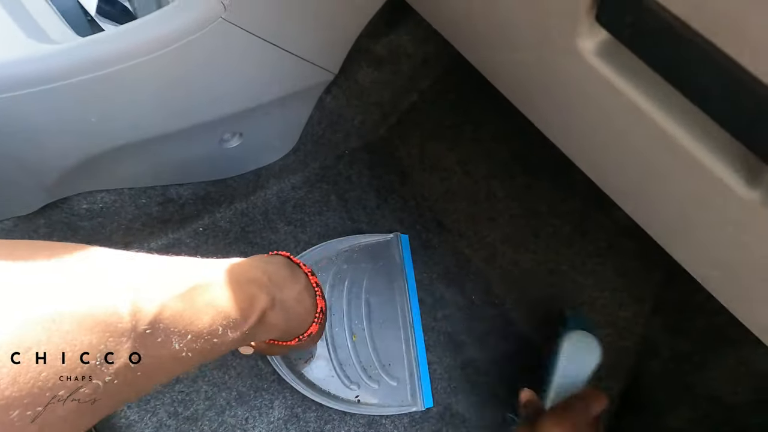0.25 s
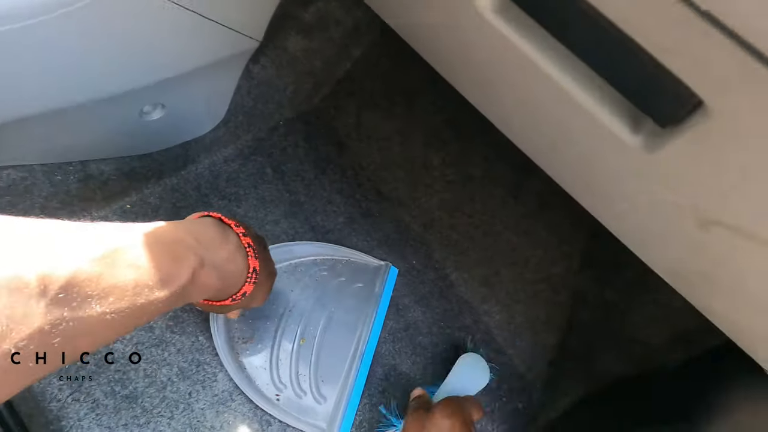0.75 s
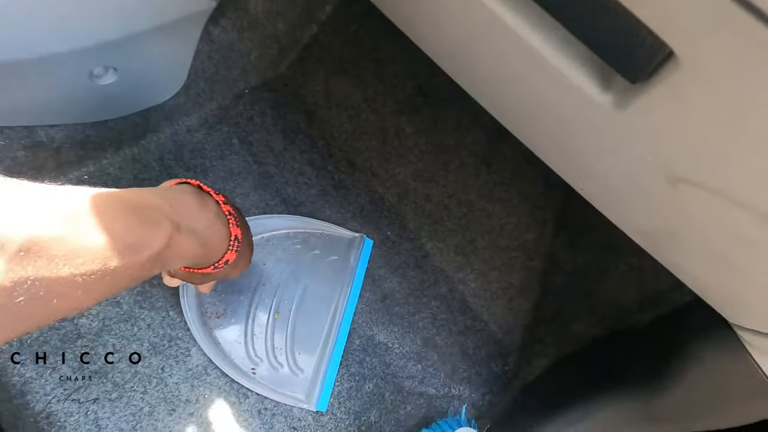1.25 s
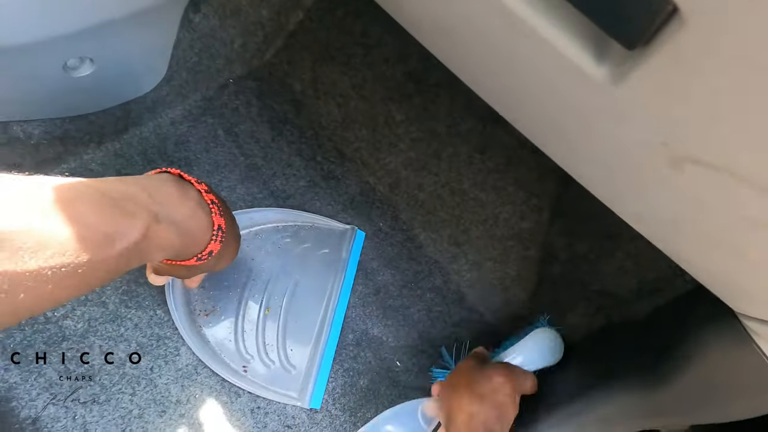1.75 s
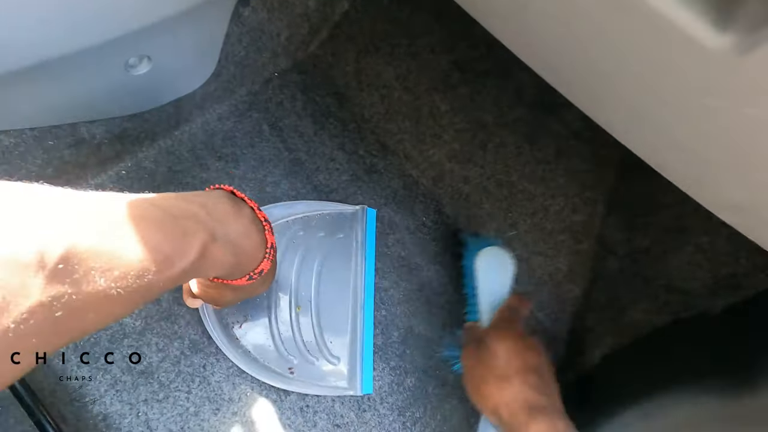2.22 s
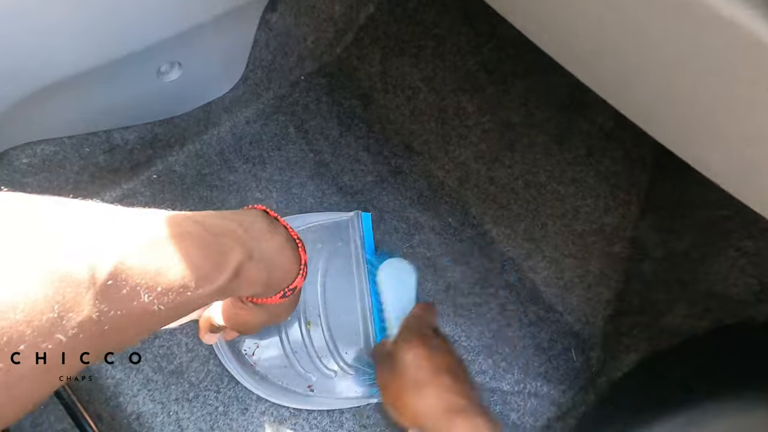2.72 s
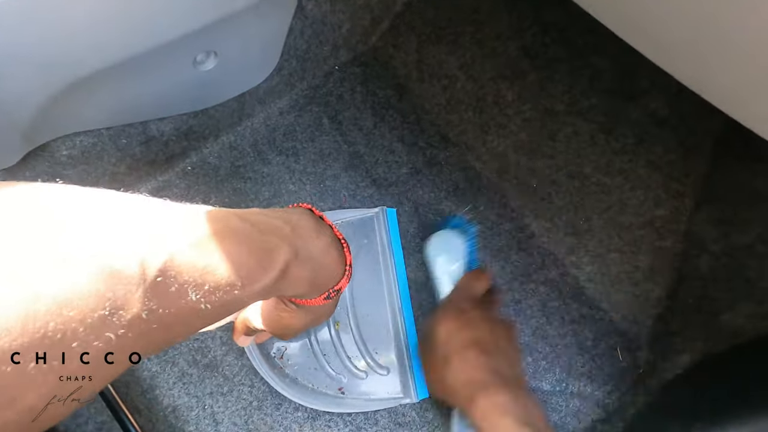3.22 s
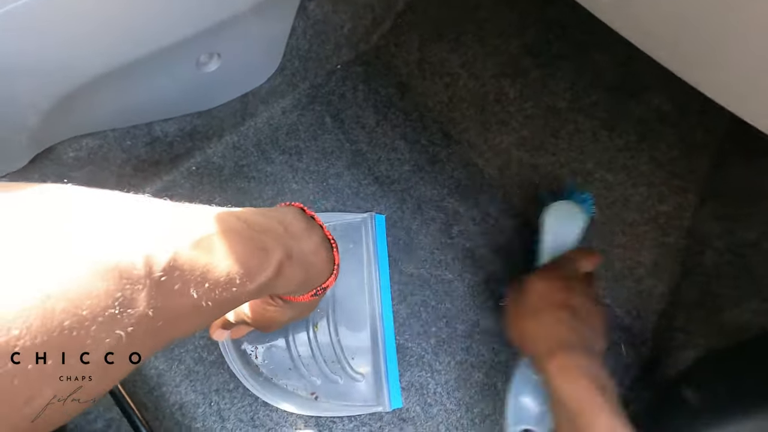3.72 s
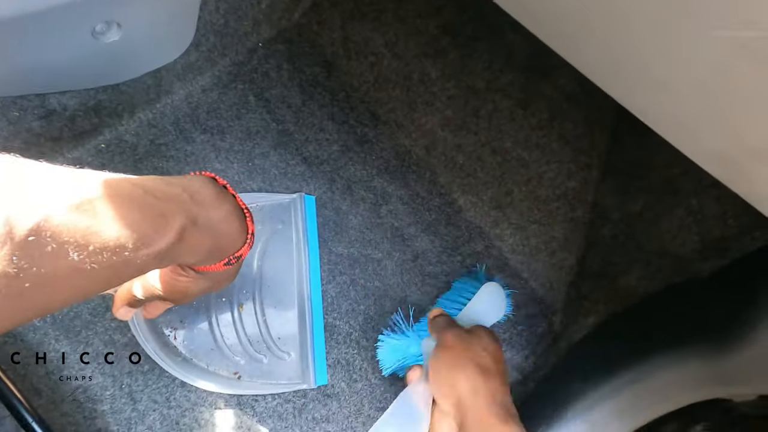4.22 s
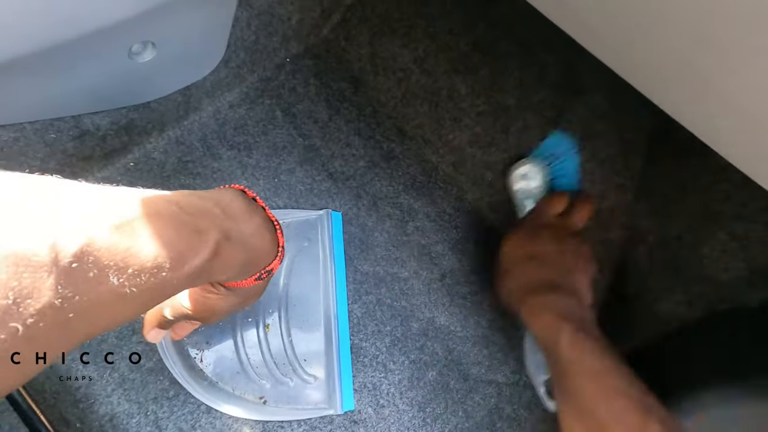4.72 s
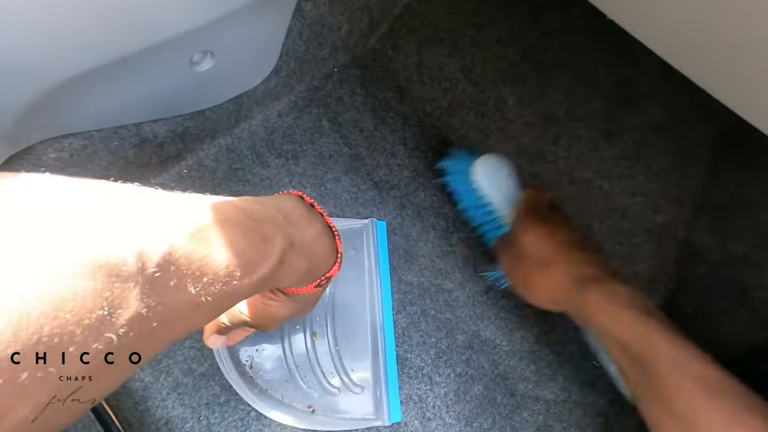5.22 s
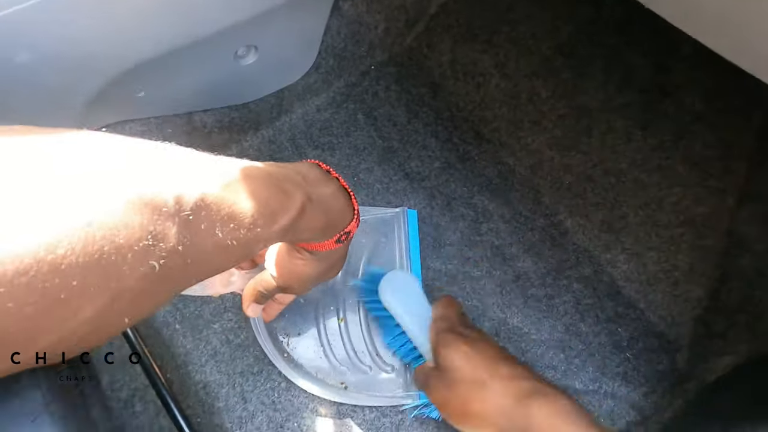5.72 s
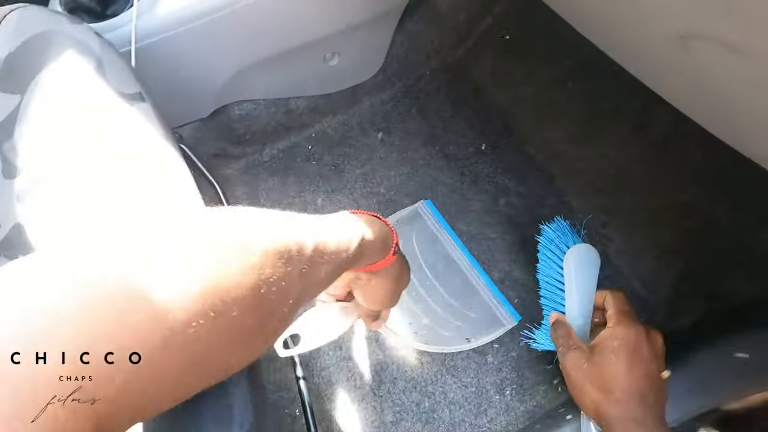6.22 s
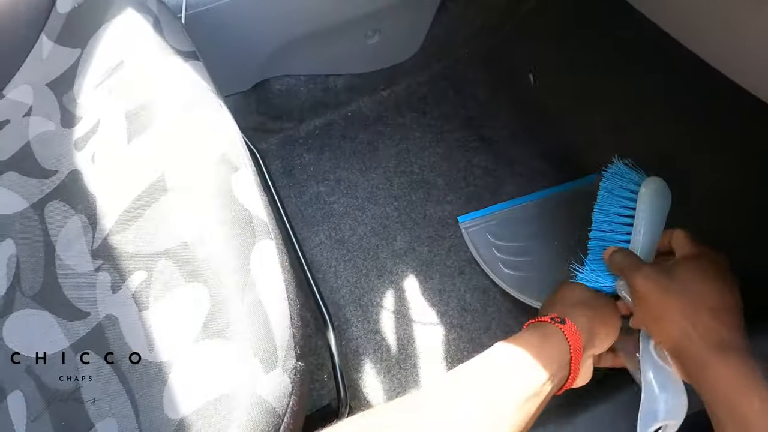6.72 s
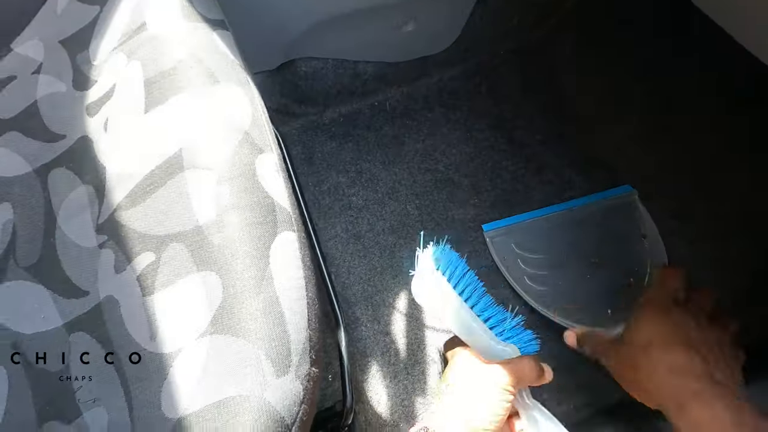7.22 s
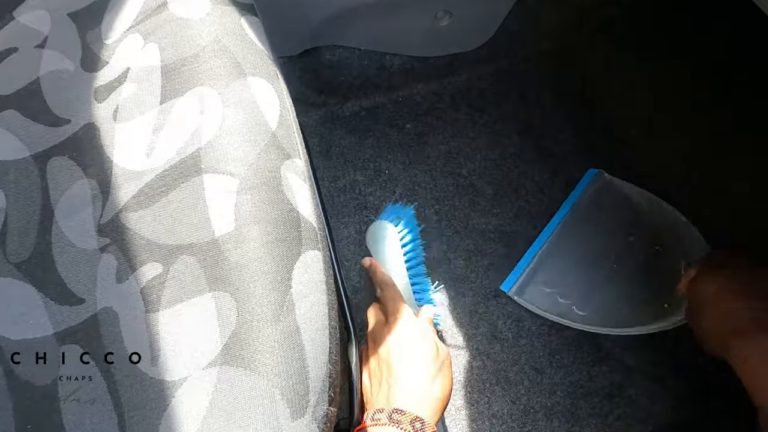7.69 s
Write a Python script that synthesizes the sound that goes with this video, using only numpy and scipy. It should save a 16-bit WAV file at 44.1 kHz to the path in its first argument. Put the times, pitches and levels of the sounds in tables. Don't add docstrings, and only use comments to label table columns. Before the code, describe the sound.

Brisk bristle strokes, each a dull knock and a crisp hiss, give way to plastic clacks, soft bumps and scraping inside a parked car.

```python
import sys
import numpy as np
from scipy import signal
from scipy.fft import rfft, irfft, next_fast_len
from scipy.io import wavfile

SR = 44100
rng = np.random.default_rng(int(sys.argv[2]) if len(sys.argv) > 2 else 0)


def wav_record(signal):
    frames = np.transpose(np.atleast_2d(signal))
    bounded = np.clip(frames, -1, 1)
    quanta = np.round(bounded * 32767).astype(np.int16)
    wavfile.write(sys.argv[1], SR, quanta)


def convert_level_to_amplitude(level_db):
    exponent = np.asarray(level_db, float) / 20
    return 10 ** exponent


N = 350595

# time in seconds, strength in dB.
WIND = [(0, -56), (1.08, -40), (1.16, -13), (1.28, -44), (4.8, -39), (5.05, -27), (5.25, -68), (5.9, -40),
        (6.15, -31), (6.62, -42), (6.76, -17), (6.86, -31.5), (7.04, -26), (7.08, -17.5), (7.28, -19.5),
        (7.55, -18.5), (7.66, -37), (7.95, -30)]
# frequency in Hz, density in dB per Hz.
RUMBLE_SPECTRUM = [(26, -4), (31, -9), (38, -6.5), (50, -10), (68, -4.5), (85, -29), (120, -9.5)]
# frequency in Hz, density in dB per Hz.
GUST_SPECTRUM = [(70, -31), (100, 4), (150, 2.5), (220, -5.5), (350, -15.5), (600, -19), (1000, -26)]
# frequency in Hz, density in dB per Hz.
AIR_SPECTRUM = [(120, -49), (200, 8.5), (269, 5.5), (404, 3), (804, 3.5), (1060, 4), (1600, -10),
                (2490, -16.5), (6530, -24.5), (10000, -23), (13000, -62), (22000, -120)]
# frequency in Hz, left-right likeness from 0 to 1.
LIKENESS = [(140, 1), (270, 1), (450, 1), (950, 0.91), (2380, 1), (5980, 0.87), (9000, 0.86), (14000, 0.56)]
# frequency in Hz, left minus right in dB.
LEAN = [(60, 0.6), (180, -1), (550, -.8), (1650, -1.2), (4970, -1.0), (15000, .5)]
# frequency in Hz, left lead in radians.
LEFT_LEAD = [(120, 0), (300, -0.08), (1000, -.25), (2400, -0.9), (5000, -0.37), (8100, 0.12)]
# time in seconds, peak in dB, frequency in Hz, T60
# in seconds.
RINGS = [(2.7278, -16, 1360, 0.0082), (4.8235, -16, 910, .012), (5.1318, -10.5, 700, 0.016),
         (6.066, -15.5, 317, 0.015), (6.072, -20, 594, 0.052), (6.256, -24, 1100, .012),
         (6.1745, -11, 1150, 0.0089), (6.1485, -11, 520, 0.038), (6.19, -22, 477, .04),
         (2.4325, -17, 595, 0.0079), (5.4295, -12, 537, 0.018), (6.1755, -15, 640, 0.027),
         (6.2215, -16.5, 2430, 0.019), (6.223, -18, 600, 0.037), (7.055, -21, 227, .04),
         (7.192, -23, 300, .03), (7.29, -28, 420, .025), (7.321, -19, 240, 0.036),
         (7.376, -21.5, 377, 0.032), (7.392, -17, 260, 0.036), (7.465, -21, 300, .03),
         (7.53, -20, 326, 0.025), (7.77, -35, 1240, .03), (7.793, -27, 1150, .03), (7.808, -30, 1240, .03),
         (7.846, -36, 1210, .03), (7.869, -28, 1180, 0.038), (7.886, -43, 1200, .03),
         (7.93, -37, 1190, .03)]
# frequency in Hz, level in dB, T60 in seconds.
PAN_MODES = [(534, 20, 0.042), (724, 21.5, 0.011), (326, 3.5, 0.16), (2490, 14, 0.056), (3140, 0, 0.01),
             (4930, 44, 0.0032), (5930, -1, 0.0035), (7140, -15, .005)]
# time in seconds, peak in dB, low modes and middle in relative dB.
KNOCKS = [(0.0147, -26, -28, -5.5), (0.6393, -28, 3, -6), (1.038, -45, 19, 11), (1.1124, -28, 2, -3),
          (1.8117, -41, -12, -16), (3.1654, -23.5, -26, -16), (4.2903, -36, 5, -15), (4.508, -30, -30, -2),
          (5.043, -29.5, -13.5, -28), (5.957, -23.5, -34, -18), (6.0347, -26, -21, -25),
          (6.0639, -27.5, 9.5, 5.5), (6.1458, -33, 12, -1), (6.1754, -19, 4, -1.5), (6.2215, -18, 0, -5.5),
          (6.256, -31, 3, 1), (6.3564, -27, -5.5, -19), (7.5666, -56.5, 0, 19), (0.122, -17.5, -25, -25),
          (0.739, -17, -33, -16), (1.069, -27.5, -22, 2), (1.391, -15, -17, -11.5), (4.239, -21, -35, -3),
          (4.769, -13, -15, -33), (5.492, -26, -13, 1)]
# time in seconds, peak in dB.
TICKS = [(6.576, -42), (6.678, -36), (6.886, -40), (6.914, -46), (6.933, -40), (6.986, -42), (7.19, -47),
         (7.24, -48), (7.291, -43), (7.311, -57), (7.379, -54), (7.418, -48), (7.448, -43), (7.468, -44),
         (7.568, -47)]
# time in seconds, effort in dB.
HANDLING = [
    (6.034, -51),
    (6.078, -37),
    (6.17, -44.5),
    (6.23, -43),
    (6.7, -45),
    (6.76, -54),
    (7.06, -56),
    (7.14, -61),
    (7.34, -77),
]
# frequency in Hz, density in dB per Hz.
RUSTLE_SPECTRUM = [(760, -23), (1300, -7), (1700, -4), (1990, 9.5), (3030, -12), (3510, 1.5), (6980, -2.5),
                   (8260, -11.5), (11800, -19), (14000, -22)]
# start in
# seconds, length in seconds, rustle or scrape in dB, carpet in relative dB.
PAN_CONTACTS = [(6.33, 0.027, -52, -2), (6.43, 0.055, -62, 2), (6.53, 0.074, -49, 0.5), (6.63, 0.059, -59, 8),
                (6.79, 0.083, -49.5, -3), (6.94, 0.059, -58, 7), (7.0, 0.09, -53, -12), (7.17, 0.028, -61, -6),
                (7.46, 0.074, -54.5, 12.5), (7.545, 0.035, -42.5, 6), (7.638, 0.061, -31.5, -10),
                (7.66, 0.38, -46, 3), (7.76, 0.053, -43, 1), (7.585, 0.04, -65, 1), (7.9, 0.056, -56, 8)]
# frequency in Hz, width in Hz, level in dB.
LIP_MODES = [(1210, 230, -10), (1620, 570, 11), (2020, 480, 8.5), (3200, 550, 7.5), (3930, 440, 3.5),
             (5170, 1500, -3), (7100, 900, -9), (8300, 810, -22)]
# time in seconds, peak in dB, ring in Hz.
CATCHES = [(0.089, -27, 900), (0.771, -18.5, 690), (0.799, -19, 1000), (1.019, -44, 910),
           (1.445, -30, 1000), (1.505, -19, 1010), (1.522, -12, 1020), (1.64, -28, 1200), (1.923, -9, 700),
           (2.181, -20, 910), (2.205, -12.5, 920), (2.414, -30, 700), (2.483, -21, 1090),
           (3.614, -25, 1080), (3.847, -37, 590), (3.906, -12, 1100), (4.296, -18, 1100), (4.309, -9, 1030),
           (4.513, -14.5, 900), (4.562, -13, 1010), (4.823, -18, 1000), (4.847, -17, 1110),
           (5.1291, -15, 740), (5.305, -17.5, 1100), (5.485, -16.5, 796), (5.749, -16, 590),
           (6.074, -15.5, 603), (6.088, -31, 494), (6.191, -16, 560), (6.237, -21, 550), (6.575, -21, 795),
           (6.695, -26, 800)]
# time in seconds, knock peak in dB, knock in Hz, boom in dB, slap in dB.
LANDINGS = [(0.12, -17, 430, -32, -12.5), (0.452, -16, 410, -24, -13), (0.74, -13.5, 404, -23.5, -13.5),
            (1.067, -14, 396, -24, -20), (1.126, -5.5, 423, -24.5, -12.5), (1.391, -15.5, 443, -35, -18),
            (1.875, -26, 570, -30, -16.5), (1.891, -13, 370, -28, -15.5), (1.952, -11, 416, -31, -13.5),
            (2.166, -16.5, 555, -31, -15.5), (2.43, -7.5, 447, -20, -19), (2.7283, -6, 378, -20.5, -17),
            (3.022, -9.5, 387, -25, -16.5), (3.034, -16, 384, -26, -17), (3.311, -8.5, 405, -24, -18.5),
            (3.575, -11, 408, -21.5, -15.5), (3.863, -7.5, 367, -22.5, -15.5),
            (4.235, -16.5, 456, -23.5, -14), (4.523, -8.5, 388, -25.5, -13),
            (4.769, -15.5, 407, -25, -10.5), (4.8, -11.5, 283, -20, -40), (5.13, -3.5, 299, -16.5, -31),
            (5.4279, -8.5, 297, -19.5, -27), (5.731, -16.5, 447, -22, -18)]
# time in seconds, knock peak in dB, knock in Hz, boom in dB.
BUMPS = [(4.307, -24, 402, -56), (5.227, -48, 258, -28.5), (2.895, -32, 342, -47), (5.491, -17, 400, -20),
         (6.728, -40, 323, -26), (6.882, -21.5, 362, -21.5), (7.087, -16, 240, -49), (7.16, -18, 248, -45),
         (7.236, -21.5, 420, -22.5), (7.277, -22, 248, -36), (7.318, -24, 260, -45),
         (7.352, -18.5, 290, -24), (7.432, -25, 304, -34), (7.506, -21, 287, -24.5), (7.547, -23, 314, -25)]
# frequency in Hz, level in dB, T60 in seconds.
FLOOR_MODES = [(149.1, 14.5, 0.12), (175, 12.5, 0.062), (217.5, 10, 0.054)]
# landing in seconds, time to full speed and to lift-off in seconds,
# bristle hiss in dB, carpet drag in dB.
STROKES = [(0.117, 0.054, 0.13, -21, -22), (.451, 0.068, 0.12, -25.5, -24), (0.744, 0.099, .15, -22, -22.5),
           (1.095, 0.02, .13, -26.5, -26.5), (1.392, 0.14, 0.32, -25, -23), (1.5, 0.074, 0.11, -21, -24.5),
           (1.6, 0.031, 0.15, -25.5, -27.5), (1.876, 0.093, 0.17, -23, -37),
           (2.163, 0.06, 0.13, -19.5, -24), (2.429, 0.054, 0.13, -20.5, -22),
           (2.725, 0.036, 0.1, -21.5, -27.5), (3.022, 0.044, 0.099, -20, -27.5),
           (3.308, 0.032, 0.09, -19, -22.5), (3.573, 0.052, 0.12, -19.5, -23.5),
           (3.859, 0.043, 0.1, -19.5, -27), (4.236, 0.089, 0.14, -22.5, -26),
           (4.519, 0.06, 0.1, -19.5, -26.5), (4.769, 0.092, 0.145, -21, -22),
           (4.869, 0.045, 0.086, -23.5, -27.5), (5.13, 0.076, 0.16, -21, -28.5),
           (5.428, 0.085, 0.12, -19, -25), (5.73, 0.04, 0.097, -19.5, -24.5)]
# start in seconds, length in seconds, hiss in dB, carpet in relative dB.
GRAZES = [(0, 0.17, -42.5, 6.5), (.38, 0.21, -43.5, 1), (.6, 0.13, -43, 3), (.92, 0.072, -47, 8.5),
          (1.028, 0.062, -41.5, 12), (1.3, 0.17, -49.5, -5), (1.85, 0.2, -42, 12.5),
          (2.07, 0.098, -44.5, -7), (2.33, 0.039, -44.5, 1), (2.57, 0.11, -42, 1.5), (2.85, 0.081, -49, 7),
          (2.97, 0.22, -57.5, 14), (3.15, 0.034, -44, -12), (3.42, 0.051, -38, 2.5),
          (3.52, 0.038, -59, 12.5), (3.99, 0.14, -58.5, 7.5), (4.14, 0.1, -50.5, 12), (4.2, 0.064, -60, 8),
          (5.7, 0.033, -67, 2), (.715, 0.025, -48, 5.5), (4.4, 0.12, -56.5, 13), (4.7, 0.1, -60, 18),
          (5.03, 0.025, -45.5, -17), (5.085, 0.053, -59, 9.5), (5.575, 0.027, -36.5, -2),
          (5.62, 0.031, -56.5, 0), (4.67, 0.034, -58, 7), (1.78, 0.033, -60, 5), (5.94, 0.019, -50.5, 5.5),
          (5.99, 0.049, -57, 4), (.29, 0.071, -57, 8), (3.725, 0.032, -51.5, 4), (4.285, 0.017, -51, 8)]
# frequency in Hz, density in dB per Hz.
BRISTLE_SPECTRUM = [(1180, -3.5), (2000, -1.5), (2240, -7), (2540, -8.5), (2790, -7), (4470, -1.5),
                    (5000, -5), (6190, 0), (7600, -9), (9340, -14.5), (12100, -20), (14100, -17),
                    (15500, -54)]
# frequency in Hz, density in dB per Hz.
CARPET_SPECTRUM = [(120, 6.5), (200, 3), (273, -1), (452, 8.5), (799, -1), (908, 4), (1080, 10.5),
                   (1490, 0), (2240, -9.5), (2600, -4.5), (3380, -12), (5720, -120)]


def rms_one(x):
    return x / np.sqrt(np.mean(x ** 2) + 1e-20)


def peak_one(x):
    return x / np.abs(x).max()


def seconds(length_s):
    return np.arange(int(length_s * SR)) / SR


def gain_curve(rows):
    s, db = np.transpose(rows)
    return convert_level_to_amplitude(np.interp(np.arange(N) / SR, s, db))


def at_hz(points, hz):
    points_hz, values = np.transpose(points)
    return np.interp(np.log(hz), np.log(points_hz), values)


def drift(rate_hz, count):
    r = np.exp(-40 * np.pi * rate_hz / SR)
    noise = rng.standard_normal(count // 20 + 4002)
    return rms_one(signal.lfilter([1], [1, -2 * r, r * r], noise)[4000:])


def every_sample(slow, count):
    return np.interp(np.arange(count) / 20, np.arange(len(slow)), slow)


def ring(clicks, hz, t60_s):
    r = convert_level_to_amplitude(-60 / (t60_s * SR))
    w = 2 * np.pi * hz / SR
    return signal.lfilter([0, np.sin(w)], [1, -2 * r * np.cos(w), r * r], clicks + 1e-18)


def band(x, low_hz, high_hz):
    return signal.sosfilt(signal.butter(2, [low_hz, high_hz], "band", fs=SR, output="sos"), x)


def low_pass(x, hz, order):
    return signal.sosfilt(signal.butter(order, hz, fs=SR, output="sos"), x)


def grains(per_s, spread_db, count=N):
    shape = (2, 2, count)
    sizes = convert_level_to_amplitude(spread_db * np.minimum(rng.exponential(1, shape), 4))
    signed = sizes * rng.choice([-1, 1], shape)
    return signed * (rng.random(shape) < per_s / SR) + 1e-18


def coloured(source, spectrum, patchy_db, rate_hz, apart=None, bands_per_octave=3):
    count = source.shape[-1]
    out, together = np.zeros((2, count)), drift(rate_hz, count)
    low_hz, top_hz = spectrum[0][0], min(spectrum[-1][0], 17000)
    bands = max(2, round(bands_per_octave * np.log2(top_hz / low_hz)))
    edges_hz = np.geomspace(low_hz, top_hz, bands + 1)
    for k, (a, b) in enumerate(zip(edges_hz, edges_hz[1:])):
        hz = np.sqrt(a * b)
        mid, side = band(source[k % 2], a, b)
        alike = np.clip(at_hz(LIKENESS, hz) if apart is None else 1 - apart, 0, 1)
        flicker_db = patchy_db * (0.27 * together + drift(rate_hz, count))
        gain = every_sample(convert_level_to_amplitude(at_hz(spectrum, hz) + flicker_db), count)
        mid = gain * np.sqrt(1 + alike) * mid
        side = gain * np.sqrt(1 - alike) * side
        half_lean_db = at_hz(LEAN, hz) / 2
        out[0] += convert_level_to_amplitude(half_lean_db) * (mid + side)
        out[1] += convert_level_to_amplitude(-half_lean_db) * (mid - side)
    return rms_one(out)


def add(track, sound, s):
    at = round(s * SR)
    track[at:at + len(sound)] += sound[:N - at]


def smooth(x, time_s):
    memory = np.exp(-1 / (time_s * SR))
    return signal.lfilter([1 - memory], [1, -memory], x)


def traffic(white, wind, apart):
    traffic_db = -30
    rumble = coloured(white, RUMBLE_SPECTRUM, patchy_db=-0.5, rate_hz=13.0, apart=apart)
    return np.hypot(wind, convert_level_to_amplitude(traffic_db)) * rumble


def gusts(wind, turbulent, apart):
    build_s, rest_db = 0.2, -42.5
    built = np.minimum(smooth(wind, build_s), wind)
    eddies = built * turbulent + convert_level_to_amplitude(rest_db)
    noise = coloured(grains(70, 3.1), GUST_SPECTRUM, patchy_db=4.5, rate_hz=10.2, apart=apart, bands_per_octave=2)
    return eddies * noise


def still_air(white, near):
    air_db, gain_memory_s, threshold_db, dull_hz = -40.5, 0.25, -25.0, 6500
    recent = np.sqrt(smooth(near[0] ** 2, gain_memory_s))
    air = coloured(white, AIR_SPECTRUM, patchy_db=-4.0, rate_hz=7.3, bands_per_octave=2)
    return low_pass(convert_level_to_amplitude(air_db) / (1 + recent / convert_level_to_amplitude(threshold_db)) * air, dull_hz, order=2)


def outdoors(near):
    turbulent_db, calm_apart, gust_apart = -21.5, 0.09, 0.4
    wind = gain_curve(WIND)
    turbulent = wind ** 2 / (wind ** 2 + convert_level_to_amplitude(2 * turbulent_db))
    apart = np.clip(calm_apart + gust_apart * turbulent, 0, 1)
    white = rng.standard_normal((2, 2, 2, N))
    return traffic(white[0], wind, apart) + gusts(wind, turbulent, apart) + still_air(white[1], near)


def cabin(x, t60_s):
    t = seconds(0.25)
    noise = band(rng.standard_normal((2, len(t))), 90, 5000)
    tails = noise * convert_level_to_amplitude(-60 * t / t60_s) * (t > 0.002)
    tails = tails / np.sqrt((tails ** 2).sum(axis=1, keepdims=True))
    return signal.fftconvolve(x[None], tails, axes=1)[:, :N]


def rings():
    rise_s = 0.00033
    out, t = np.zeros(N), seconds(0.1)
    for s, db, hz, t60_s in RINGS:
        decay = convert_level_to_amplitude(-60 * t / t60_s) * (1 - np.exp(-t / rise_s))
        add(out, convert_level_to_amplitude(db) * peak_one(np.sin(2 * np.pi * hz * t) * decay), s)
    return out


def dustpan_knocks():
    out, t = np.zeros(N), seconds(0.12)
    for s, db, low_db, mid_db in KNOCKS:
        contact = rng.standard_normal(len(t)) * (np.exp(-t / 0.0025) + 0.1 * np.exp(-t / 0.016))
        luck_db = 2.5 * rng.standard_normal(len(PAN_MODES))
        modes = [convert_level_to_amplitude(g + e) * ring(contact, hz, t60_s) for (hz, g, t60_s), e in zip(PAN_MODES, luck_db)]
        high = 0.6 * peak_one(sum(modes[3:])) + peak_one(band(contact, 1800, 6500))
        middle = convert_level_to_amplitude(mid_db + 10.5) * peak_one(band(contact, 790, 2970))
        low = convert_level_to_amplitude(low_db + 3) * peak_one(sum(modes[:3]))
        add(out, convert_level_to_amplitude(db + 1) * (peak_one(high) + middle + low), s)
    return out


def grit_ticks():
    out, t = np.zeros(N), seconds(0.05)
    for s, db in TICKS:
        snap = rng.standard_normal(len(t)) * np.exp(-t / 0.0059)
        add(out, convert_level_to_amplitude(db) * peak_one(band(snap, 2500, 6900)), s)
    return out


def catches():
    burst_s, ring_cycles = 0.0053, 3.5
    out, t = np.zeros(N), seconds(0.05)
    for s, db, hz in CATCHES:
        burst = rng.standard_normal(len(t)) * np.exp(-t / burst_s)
        rung = ring(burst, hz, ring_cycles / hz)
        add(out, convert_level_to_amplitude(db) * peak_one(band(rung, hz / 2, hz * 2)), s)
    return out


def brush_back_knock(t, hz, jolts, rattle_db):
    sagging_hz = hz * (0.688 + 2.136 * np.exp(-t / 0.00252))
    sagging = np.sin(2 * np.pi * np.cumsum(sagging_hz) / SR + 3.5)
    knock = sagging * (1 - np.exp(-t / 0.0072)) ** 2 * np.exp(-t / 0.0026)
    rattle = ring(jolts * np.exp(-t / 0.01), hz, 9.6 / hz)
    return peak_one(knock) + 1.42 * min(1, convert_level_to_amplitude(rattle_db)) * peak_one(rattle)


def thuds():
    rise_s = 0.00079
    tick_db, muffled_db = -7.5, -38
    clean_below_db = 12
    out, t = np.zeros(N), seconds(0.15)
    rising = 1 - np.exp(-t / rise_s)
    weight = np.exp(-((t - 0.0055) / 0.00054) ** 2)
    boom = peak_one(sum(convert_level_to_amplitude(db) * ring(weight, f, t60_s) for f, db, t60_s in FLOOR_MODES))
    bumps = [(*row, row[1] + muffled_db) for row in BUMPS]
    for s, knock_db, hz, boom_db, slap_db in [*LANDINGS, *bumps]:
        jolts, slap, tick = rng.standard_normal((3, len(t)))
        rattle_db = max(slap_db - knock_db, -26) + clean_below_db
        knock = brush_back_knock(t, hz, jolts, rattle_db)
        slap = band(slap * rising * np.exp(-t / 0.0086), 796, 1375)
        tick = band(tick * rising * np.exp(-t / 0.0076), 2100, 5800)
        add(out, convert_level_to_amplitude(knock_db - 0.5) * peak_one(knock), s)
        add(out, convert_level_to_amplitude(boom_db + 10.5) * boom, s)
        add(out, convert_level_to_amplitude(slap_db + 2.0) * peak_one(slap), s + 0.001133)
        add(out, convert_level_to_amplitude(slap_db + tick_db) * peak_one(tick), s + 0.0012)
    return out


def strokes(column, rest_db, power, sag_db_per_s, release_db_per_s):
    settle_s, letting_go_s = 0.0017, 0.1
    t, out = np.arange(N) / SR, 0
    for row in STROKES:
        since, full_s, lift_s = t - row[0], row[1], row[2]
        speed = np.clip(since / full_s, 0, 1)
        swell = np.maximum(speed ** power, convert_level_to_amplitude(rest_db)) * np.clip(since / settle_s, 0, 1)
        off = np.clip(since - lift_s, 0, None)
        fading_db = sag_db_per_s * np.clip(since - full_s, 0, None)
        fading_db = fading_db + release_db_per_s * off * (1 + off / letting_go_s)
        out = np.maximum(out, swell * convert_level_to_amplitude(row[column] - fading_db))
    return out


def light_contacts(rows, edge_db_per_s):
    t, out = np.arange(N) / SR, np.zeros((2, N))
    for s, length_s, db, body_db in rows:
        outside = np.clip(np.abs(t - s - length_s / 2) - length_s / 3, 0, None)
        out += convert_level_to_amplitude([[db], [db + body_db]] - edge_db_per_s * outside)
    return out


def lip_scrape(count):
    slips = grains(3000, 1.8, count)[0]
    drive = slips[0] + 0.086 * slips
    lip = sum(convert_level_to_amplitude(db) * ring(drive, hz, 1.9 / width_hz) for hz, width_hz, db in LIP_MODES)
    return rms_one(low_pass(band(lip, 900, 5600), 8800, order=6))


def clumping():
    clumps_db = 0.7 * every_sample(drift(9.4, N), N)
    chatter_db = 1.1 * every_sample(drift(60.0, N), N)
    return convert_level_to_amplitude(clumps_db + chatter_db)


def scrubbing_and_scraping():
    hover_db, handling_body_db, hollow_db = -76, 7, 2.5
    lifted, slid = round(HANDLING[0][0] * SR), round(HANDLING[-1][0] * SR)
    in_hand = (np.arange(N) >= lifted) & (np.arange(N) < slid)
    handled = gain_curve(HANDLING) * in_hand
    light, shaken = light_contacts(GRAZES, edge_db_per_s=694) + light_contacts(PAN_CONTACTS, edge_db_per_s=1004)

    pile = coloured(grains(2000, 2.94), CARPET_SPECTRUM, patchy_db=4.0, rate_hz=9.6)
    tips = coloured(grains(10000, 2.3, lifted), BRISTLE_SPECTRUM, patchy_db=2.0, rate_hz=20.6)
    rustle = coloured(grains(6500, 1.7, slid - lifted), RUSTLE_SPECTRUM,
                      patchy_db=-0.5, rate_hz=12.0, bands_per_octave=2)
    contact = np.concatenate([tips, rustle, lip_scrape(N - slid)], axis=1)
    pan_ring = sum(rms_one(ring(pile, hz, t60_s)) for hz, _, t60_s in PAN_MODES[:2]) / 2
    hollow = convert_level_to_amplitude(hollow_db) * handled * pan_ring

    hiss = strokes(column=3, rest_db=-22.5, power=2, sag_db_per_s=36.5, release_db_per_s=432)
    drag = strokes(column=4, rest_db=-7.5, power=0.5, sag_db_per_s=48, release_db_per_s=422)
    bright = hiss + light + handled + convert_level_to_amplitude(hover_db)
    body = drag + shaken + convert_level_to_amplitude(handling_body_db) * handled
    return clumping() * (bright * contact + body * pile + hollow)


def scene():
    scrubbing = scrubbing_and_scraping()
    hits = thuds() + dustpan_knocks() + rings()
    room = outdoors(scrubbing) + convert_level_to_amplitude(-19.0) * cabin(hits, t60_s=0.014)
    footwell = convert_level_to_amplitude(-25) * cabin(scrubbing[0], t60_s=0.14)
    close = (hits + catches() + grit_ticks()) * convert_level_to_amplitude([[-0.3], [0.3]])
    return close + scrubbing + room + footwell


def roll_off(x):
    return signal.sosfilt(signal.butter(12, 15620, fs=SR, output="sos"), x)


def record(dry):
    size = next_fast_len(N)
    hz = np.arange(size // 2 + 1) * SR / size + 1
    turn = np.exp(1j * at_hz(LEFT_LEAD, hz))
    left = irfft(rfft(dry[0], size) * turn, size)[:N]
    cut = low_pass(np.array([left, dry[1]]), 12650, order=10)
    return roll_off(2.9 * np.tanh(cut / 3.204))


dry = scene()
out = record(dry)
wav_record(out)
```